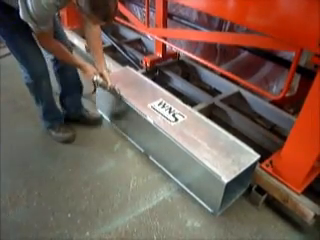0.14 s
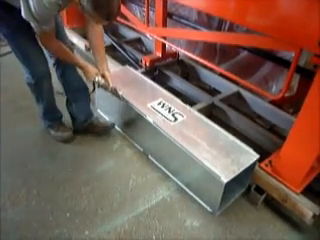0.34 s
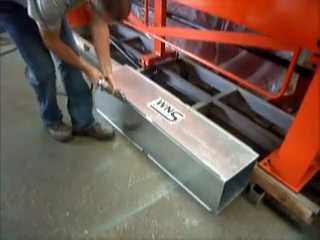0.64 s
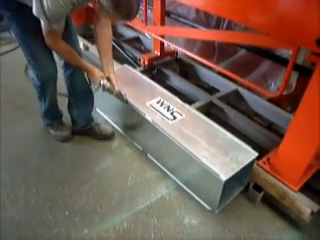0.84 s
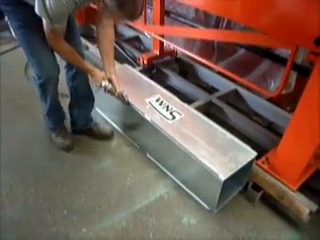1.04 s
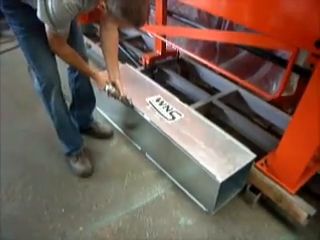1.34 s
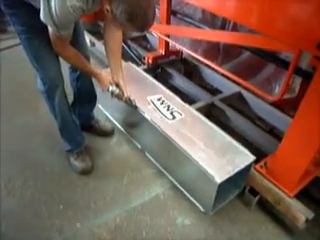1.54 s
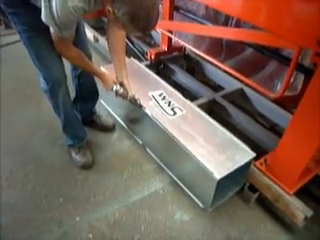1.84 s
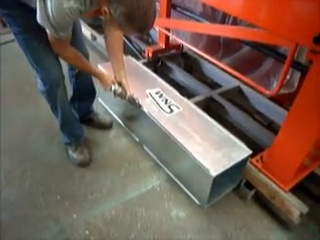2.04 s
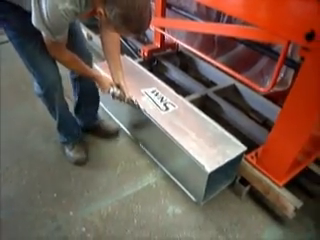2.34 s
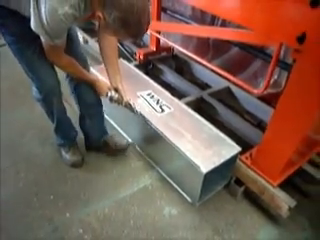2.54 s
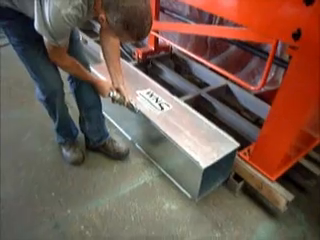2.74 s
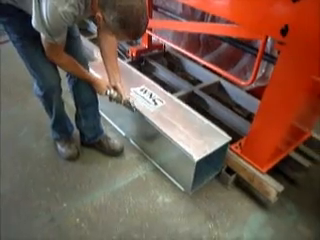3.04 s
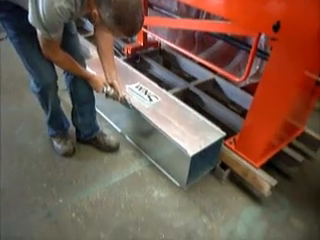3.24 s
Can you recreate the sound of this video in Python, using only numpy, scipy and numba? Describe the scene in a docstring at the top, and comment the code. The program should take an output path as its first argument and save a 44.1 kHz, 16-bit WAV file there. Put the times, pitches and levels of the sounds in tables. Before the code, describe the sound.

Loud metallic buzzing roar of a handheld pneumatic hammer folding a hollow sheet-metal seam

```python
"""A hard metallic rattle, some 34 blows a second: an air hammer folds the seam of a long sheet-metal duct.
Every blow rings hundreds of wall modes, treble first; the tool creeps along, so the ring changes colour.
A few panel modes sing on as lines, short noise bursts make the crack of the hammer head.
The hall blurs walls and crack; below lie the duct's boom, the piston's thump and a faint rumble.
A narrow-band recorder evens the level, rounds the peaks and cuts off above 4 kHz; one dry tick sticks out."""
import sys
import numpy as np
from scipy import signal
from scipy.io import wavfile
from scipy.ndimage import uniform_filter1d, minimum_filter1d
from numba import njit

SR = 44100
rng = np.random.default_rng(int(sys.argv[2]) if len(sys.argv) > 2 else 0)


def natural_amplitude(level_db):
    """Convert a level in decibels to a linear amplitude factor, elementwise."""
    exponent = np.asarray(level_db, float) / 20
    return 10 ** exponent


def inscribe(sig):
    """Save sig as 16-bit PCM at rate SR to the path in sys.argv[1].

    A 1-D sig is mono; a 2-D sig holds one channel per row.
    Samples are clipped to [-1, 1] before scaling.
    """
    pcm = np.round(np.clip(np.atleast_2d(sig).T, -1, 1) * 32767)
    wavfile.write(sys.argv[1], SR, pcm.astype(np.int16))


N = 149940
BLOWS_HZ = 33.85
PRE_S = .5  # lead-in: the tool is already running when the sound starts


def unit(x):
    """Scale to rms 1."""
    return x / np.sqrt(np.mean(x ** 2))


def on_log(table, hz):
    """Read a (f/Hz, value) table along a logarithmic frequency axis."""
    table_hz, value = np.array(table).T
    return np.interp(np.log(hz), np.log(table_hz), value)


def band(x, order, low_hz, high_hz):
    """Butterworth band-pass."""
    return signal.sosfilt(signal.butter(order, [low_hz, high_hz], "band", fs=SR, output="sos"), x)


def pole(hz, t60):
    """Decaying rotation per sample: one damped mode."""
    return np.exp(2j * np.pi * hz / SR - np.log(1000) / (t60 * SR))


@njit
def ring(poles, when, kick, n):
    """Every mode is kicked at its own moments (in samples) and rings on."""
    out = np.zeros(n)
    for m in range(len(poles)):
        state, k, p = 0j, 0, poles[m]
        for i in range(n):
            state *= p
            if k < when.shape[0] and i >= when[k, m]:
                state += kick[k, m]
                k += 1
            out[i] += state.imag
    return out


# The piston hurries and drags with the load: t/s, lead on an even beat/strokes
STROKE_LEAD = [(0, .37), (.09, .39), (.14, .52), (.35, .26), (.6, -.09), (.87, -.02), (1.0, -.09),
               (1.36, .1), (1.6, -.18), (1.75, -.05), (1.97, .01), (2.07, -.16), (2.35, .2), (2.52, .51),
               (2.7, .57), (3.02, .2), (3.16, .35), (3.4, .1)]


def piston(t):
    """Running stroke count of the piston, and the times at which it passes whole strokes."""
    lead = uniform_filter1d(np.interp(t, *np.array(STROKE_LEAD).T), size=1500)
    strokes = BLOWS_HZ * t + lead
    beat = t[1:][np.diff(np.floor(strokes)) > 0]
    return strokes, beat


# Strokes that half miss: t/s, level/dB
HALF_MISSES = [(.105, -16.5)]


def strike(beat):
    """Each blow lands just before its stroke turns, a little off in time and strength."""
    head_start_s, jitter_s, scatter_db = .002, .0006, .6
    blows = beat - head_start_s + jitter_s * rng.standard_normal(len(beat))
    db = scatter_db * rng.standard_normal(len(beat))
    for s, weak_db in HALF_MISSES:
        db[np.argmin(abs(blows - s))] = weak_db
    return blows, natural_amplitude(db)


# How hard the tool works: t/s, force of the blows level/dB, duct boom level/dB (before its trim)
WORKLOAD = [(0, -8.5, -31), (.25, -11.5, -34.5), (0.501, -12.5, -36), (0.802, -10.5, -31),
            (1.049, -11.5, -31.5), (1.301, -12, -26.5), (1.5, -13, -29), (1.7, -12.5, -24),
            (1.951, -13.5, -28), (2.149, -10, -24), (2.402, -9, -29.5), (2.601, -8.5, -24.5),
            (2.9, -9.5, -29.5), (3.151, -11, -29.5), (3.4, -12, -28)]


def effort(t):
    """Slow gain curves for the blows and for the boom."""
    s, force_db, boom_db = np.array(WORKLOAD).T
    return natural_amplitude(np.interp(t, s, force_db)), natural_amplitude(np.interp(t, s, boom_db))


# Stations of the tool's way along the seam: t/s
STATIONS = [0, 1.1, 2.3, 3.4]
# Broad colour of the wall modes: f/Hz, relative level/dB
WALL_COLOUR = [(60, -38), (100, -17.5), (190, -10.5), (250, -9), (360, -15), (580, -18.5), (750, -9),
               (1250, -10), (1650, -10), (2200, -5.5), (2700, -8), (3150, -15), (3600, -2.5), (4300, -7.5)]
# Typical ring time of the wall modes: f/Hz, t60/s
WALL_RING = [(100, .45), (500, .27), (1100, .27), (2000, .17), (3000, .13), (3800, .09)]
# Mode clusters that swell as the tool moves: f/Hz, width/Hz, relative level/dB at each of the four stations
WALL_CLUSTERS = [(286, 57, -2.5, -4, -4.5, -10.5), (472, 67, -9, -8, -13, -8.5),
                 (710, 150, -16.5, -9.5, -11.5, -20.5), (790, 44, -23.5, -15.5, -9, -7),
                 (1091, 100, -11.5, -5.5, -4.5, -9.5), (1486, 110, -8, -3.5, -5, -4),
                 (1810, 58, -10.5, 3, -15, -9), (2064, 25, -1, -3, -4, -3), (2404, 99, -7, -1, -4, 3),
                 (2670, 81, -3, -7.5, -1.5, 1), (2948, 290, -1, -3, -3.5, -3.5),
                 (3470, 66, -8, -23, -13.5, 8)]


def walls(blows, size, n, count=640):
    """Evenly dense plate modes; the struck spot sets how each is hit. Blows in s from the array's start."""
    place, ring_luck, phase, drift, smear = rng.random((count, 5)).T
    hz = 60 + 4240 * (np.arange(count) + place) / count
    t60 = on_log(WALL_RING, hz) * (.7 + .6 * ring_luck)
    power = np.tile(natural_amplitude(on_log(WALL_COLOUR, hz)) ** 2, (len(blows), 1))
    for f, width, *db in WALL_CLUSTERS:
        swell = natural_amplitude(np.interp(blows - PRE_S, STATIONS, db))
        power = power + np.outer(swell ** 2, np.exp(-(2 * (hz - f) / width) ** 2))
    # mode shapes pass under the tool: up to 1.5 turns a second, plus 0.1 turn of chance per blow
    chance = .1 * rng.standard_normal((len(blows), count))
    turn = phase + 1.5 * (2 * drift - 1) * blows[:, None] + chance
    # slow bending waves: the lows come late and smeared
    lag_s, spread_s = .012, .004
    lag = lag_s * (np.sqrt(4300 / hz) - 1).clip(0, 1.2) + spread_s * smear
    kick = np.sqrt(power / t60) * np.exp(2j * np.pi * turn) * size[:, None]
    return ring(pole(hz, t60), (blows[:, None] + lag) * SR, kick, n)


# Lone panel modes: f/Hz, t60/s, level/dB against the force at each of the four stations
PANEL_MODES = [(258, .2, -20, -24, -26, -29), (286, .25, -16, -19, -21, -24),
               (305, .25, -19, -18, -20, -21), (480, .4, -30, -28, -29, -26),
               (826, .35, -34, -27, -25, -20), (894, .4, -34, -30, -23, -30), (964, .4, -27, -26, -19, -22),
               (1087, .35, -28, -24, -19, -20), (1114, .35, -30, -22, -21, -27),
               (1475, .35, -22, -19, -23, -22), (1810, .3, -27, -18, -27, -28),
               (2350, .3, -23, -20, -19, -18), (2869, .35, -17, -18, -14, -14),
               (3010, .3, -18, -18, -16, -18), (3340, .3, -23, -23, -17, -21)]


def panels(blows, size, n):
    """A few lone modes of the big panels stand out as lines."""
    rows = np.array(PANEL_MODES)
    hz, t60 = rows[:, 0], rows[:, 1]
    db = np.array([np.interp(blows - PRE_S, STATIONS, row[2:]) for row in rows]).T
    per_blow = np.sqrt(2 * np.log(1000) * 2 / (t60 * BLOWS_HZ))  # evens out long and short rings
    kick = natural_amplitude(db) * size[:, None] * per_blow
    kick = kick * np.exp(2j * np.pi * .12 * rng.standard_normal(kick.shape))  # 0.12 turn of chance
    when = np.tile(blows[:, None] * SR, (1, len(rows)))
    return ring(pole(hz, t60), when, kick, n)


# Bands of the crack: f/Hz, width/Hz, lag after the blow t/s, decay t/s,
# level/dB against the force before the hall is mixed in
CRACK_BANDS = [(3653, 720, 0, 0.0076, -5.5), (3045, 630, 0.002, 0.0078, -9.5), (2610, 790, 0, 0.0065, -18),
               (2140, 860, 0.014, 0.015, -18)]


def crack(t, blows, size):
    """The head cracks: short noise bursts at every blow, the lowest band last; part of the noise repeats."""
    rise_s, renew_s = .0008, .5  # the repeated noise is renewed as the tool moves on
    alike = .6  # share of the power that repeats from blow to blow
    length = SR // 10
    out = 0
    for hz, width, lag, decay, db in CRACK_BANDS:
        k = (np.searchsorted(blows + lag, t) - 1).clip(0)
        age = (t - blows[k] - lag).clip(0)
        gate = size[k] * (1 - np.exp(-age / rise_s)) * np.exp(-age / decay)
        fresh, kept = rng.standard_normal(len(t)), rng.standard_normal((12, length))
        spot = (blows[k] + PRE_S) / renew_s
        now, at = spot.astype(int), (age * SR).astype(int) % length
        bend = np.pi / 2 * (spot % 1)
        same = np.cos(bend) * kept[now, at] + np.sin(bend) * kept[now + 1, at]
        noise = np.sqrt(alike) * same + np.sqrt(1 - alike) * fresh
        out = out + natural_amplitude(db) * unit(band(gate * noise, 2, hz - width / 2, hz + width / 2))
    return out


def hall(x):
    """Diffuse noise tail of the workshop; it changes as the tool moves from spot to spot."""
    t60_s, gap_s, spots = .9, .015, 8
    t = np.arange(SR) / SR
    fade = natural_amplitude(-60 * t / t60_s) * (1 - np.exp(-(t / gap_s) ** 2))
    spot = np.linspace(0, spots - 1, len(x))
    out = 0
    for k in range(spots):
        share = np.cos(np.pi / 2 * (spot - k).clip(-1, 1))
        out = out + signal.fftconvolve(x * share, rng.standard_normal(SR) * fade)[:len(x)]
    return out / np.sqrt(np.sum(fade ** 2))


def boom(beat, size, n):
    """The duct's boom: one low mode kicked by every stroke, band-passed."""
    hz, t60_s = 136.1, .25
    x = ring(np.array([pole(hz, t60_s)]), (beat[:, None] + PRE_S) * SR, size[:, None] + 0j, n)
    return unit(band(x, 2, hz - 18, hz + 18))


# Harmonics of the piston: multiple of the stroke rate, level/dB (rms), phase/turns
THUMP_HARMONICS = [(1, -40, 0.065), (2, -51.5, 0.045), (3, -52.5, 1), (5, -41, 0.37)]


def thump(t, strokes, beat):
    """The piston thumps: harmonics locked to the stroke, wavering in level."""
    x = 0
    for k, db, turn in THUMP_HARMONICS:
        x = x + natural_amplitude(db) * np.sqrt(2) * np.cos(2 * np.pi * (k * strokes + turn))
    waver_db = 1.5 * rng.standard_normal(len(beat[::2]))
    return x * natural_amplitude(np.interp(t, beat[::2], waver_db))


def rumble(n):
    """Faint low background: noise between 20 and 70 Hz."""
    return unit(band(rng.standard_normal(n), 1, 20, 70))


def scene():
    """The tool is already running: a lead-in is played ahead and cut."""
    pre = int(PRE_S * SR)
    t = np.arange(-pre, N) / SR
    n = len(t)
    strokes, beat = piston(t)
    blows, size = strike(beat)
    force, boom_level = effort(t)
    near = natural_amplitude(1.5) * unit(walls(blows + PRE_S, size, n)) + crack(t, blows, size)
    near = near * force
    hall_gain = natural_amplitude(-5)
    near = (near + hall_gain * hall(near)) / np.hypot(1, hall_gain)
    near = near + panels(blows + PRE_S, size, n) * force
    low = natural_amplitude(2) * boom(beat, size, n) * boom_level + thump(t, strokes, beat)
    return (near + low + natural_amplitude(-52) * rumble(n))[None, pre:]


def tick():
    """One sharp dry tick: a sudden step that dies within milliseconds, thinned below 900 Hz."""
    at_s, fall_s = 2.0209, .0005
    after = np.arange(N) / SR - at_s
    x = natural_amplitude(-5.5) * (after >= 0) * np.exp(-after.clip(0) / fall_s)
    return signal.sosfilt(signal.butter(1, 900, "high", fs=SR, output="sos"), x)


def gain_control(x):
    """Takes half of the level swing out, in dB, aiming at -13.3 dB over a 0.12 s window."""
    heard = np.sqrt(uniform_filter1d(x ** 2, int(.12 * SR)))
    return x * (natural_amplitude(-13.3) / heard) ** .5


def limit(x):
    """Peak limiter: the gain dips smoothly around every peak above the ceiling."""
    ceiling, hold = .92, int(.004 * SR)
    gain = minimum_filter1d(ceiling / np.maximum(abs(x), ceiling), 2 * hold + 1)
    return x * uniform_filter1d(uniform_filter1d(gain, hold), hold)


def band_limit(x):
    """A steep low-pass at the top of the band."""
    return signal.sosfilt(signal.butter(12, 15800, fs=SR, output="sos"), x)


def record(dry):
    """Gain control, an input that rounds peaks, a slow-sampling recorder's steep top cut, limiter, tick."""
    squash = 1.4
    x = np.tanh(squash * gain_control(dry)) / squash
    x = signal.sosfilt(signal.butter(14, 4300, fs=SR, output="sos"), x)
    x = signal.sosfilt(signal.cheby2(12, 60, 4309, fs=SR, output="sos"), x)
    mix = limit(x) + tick()
    return band_limit(mix)


dry = scene()
out = record(dry)
inscribe(out)
```